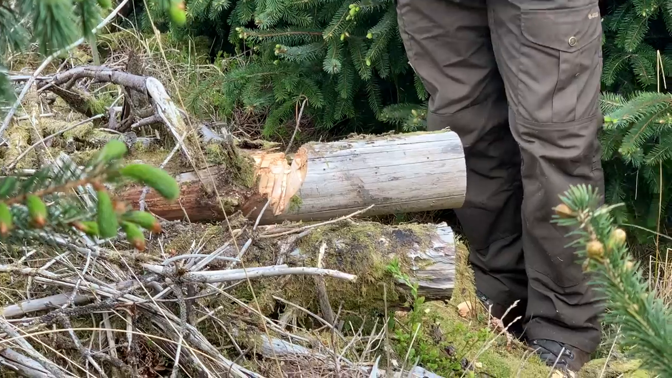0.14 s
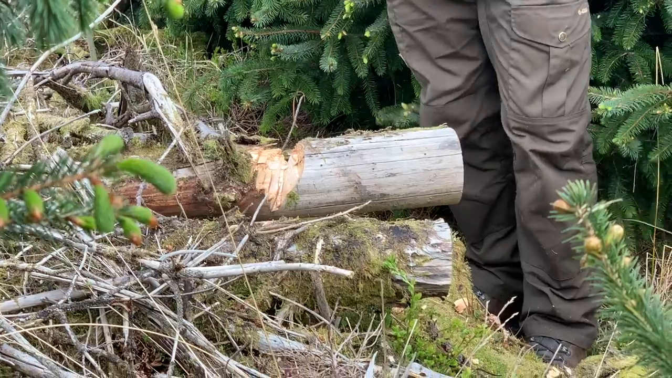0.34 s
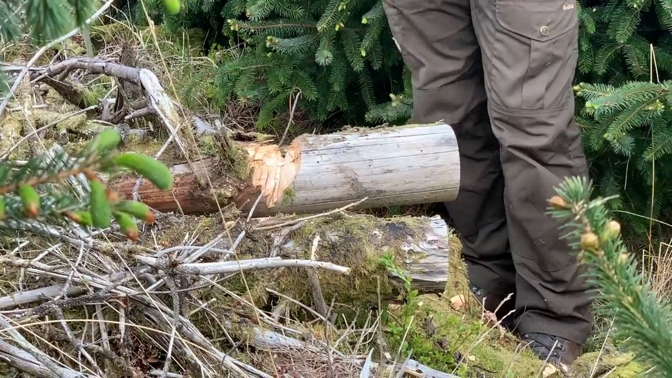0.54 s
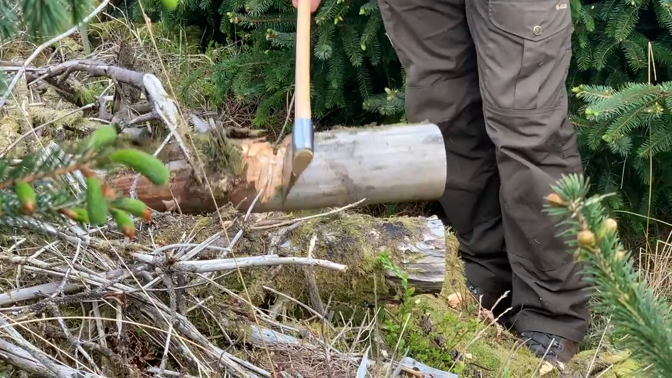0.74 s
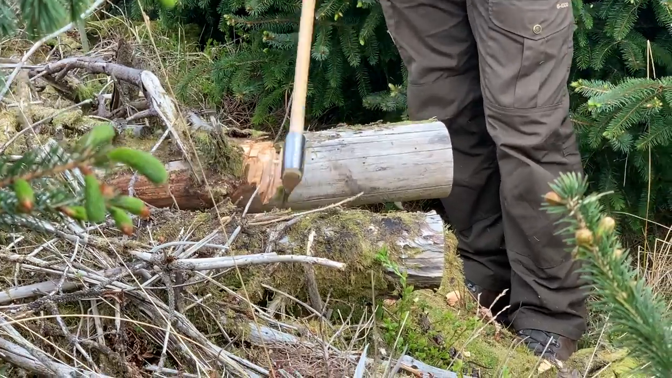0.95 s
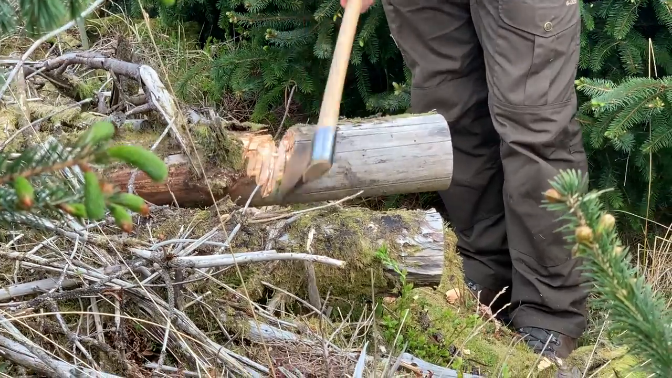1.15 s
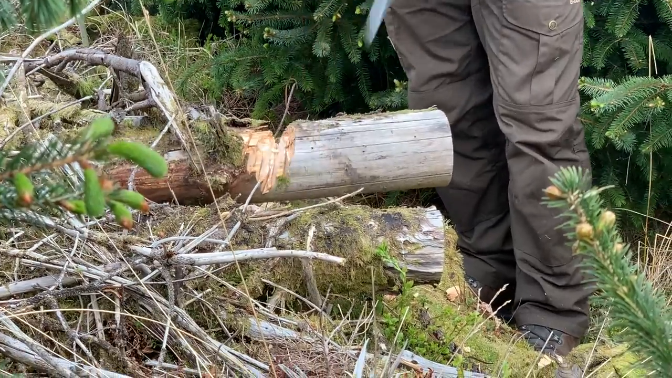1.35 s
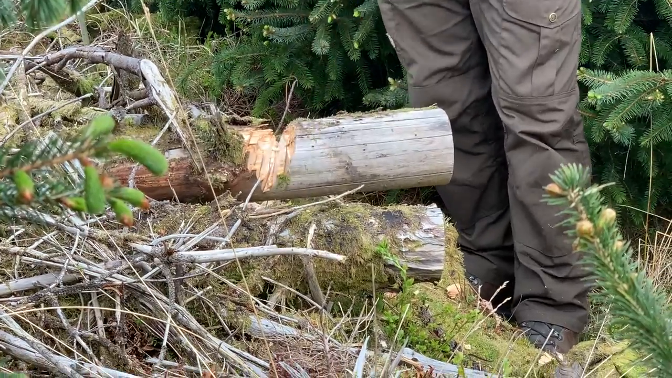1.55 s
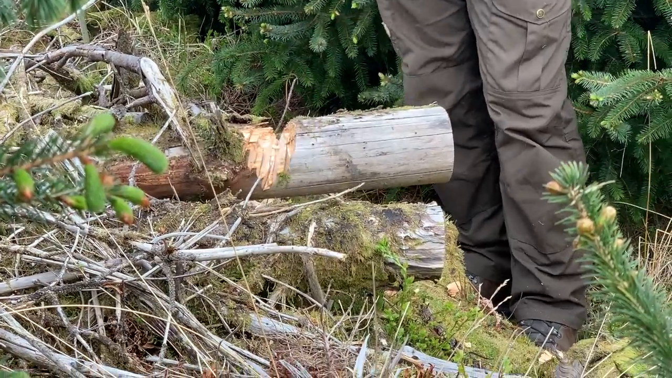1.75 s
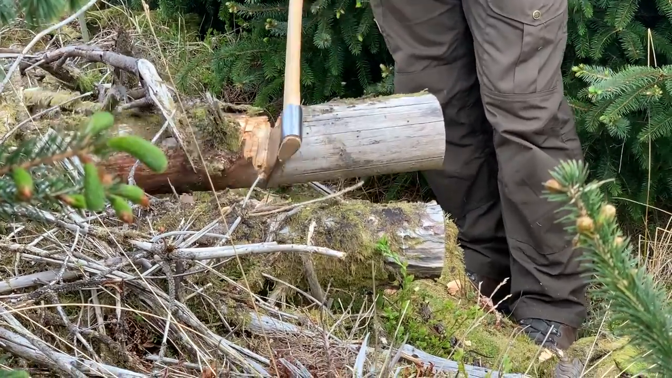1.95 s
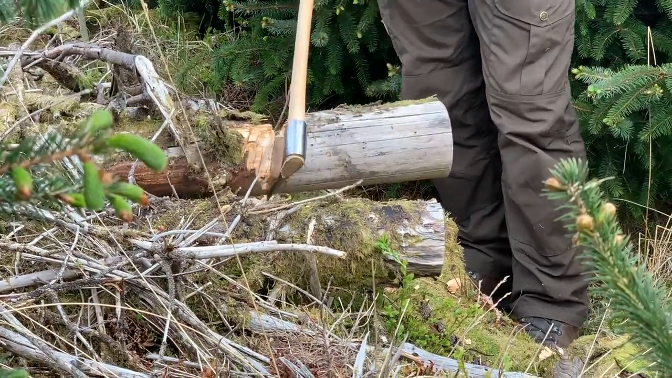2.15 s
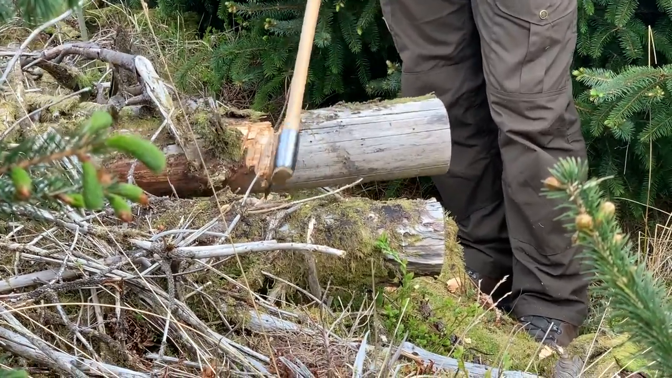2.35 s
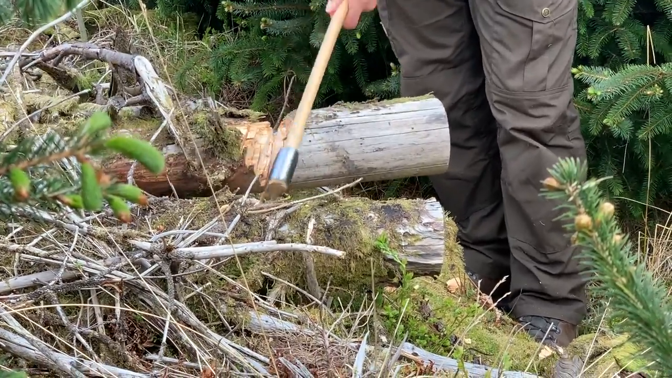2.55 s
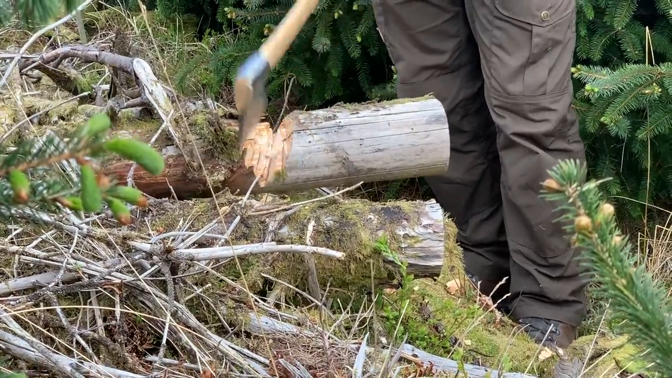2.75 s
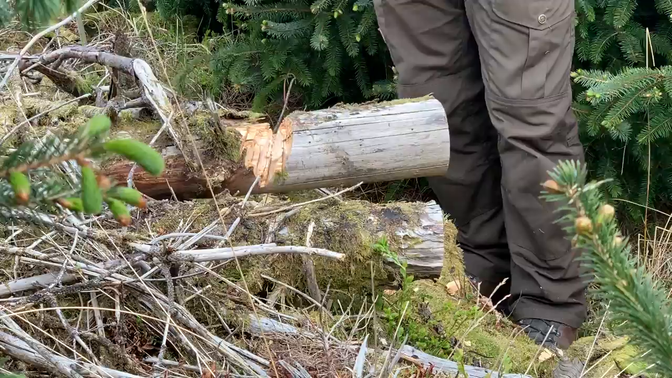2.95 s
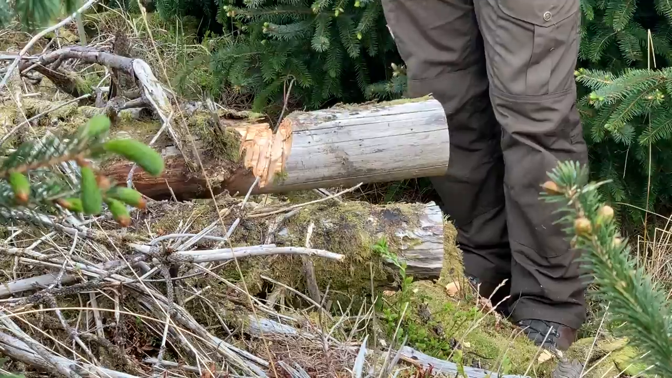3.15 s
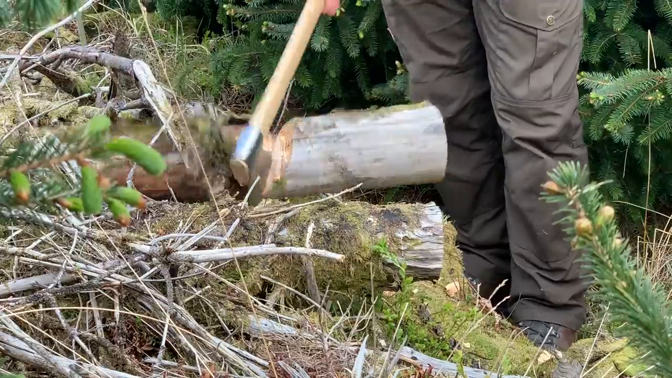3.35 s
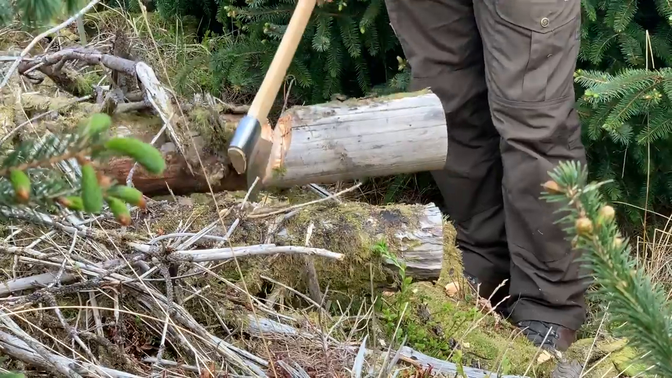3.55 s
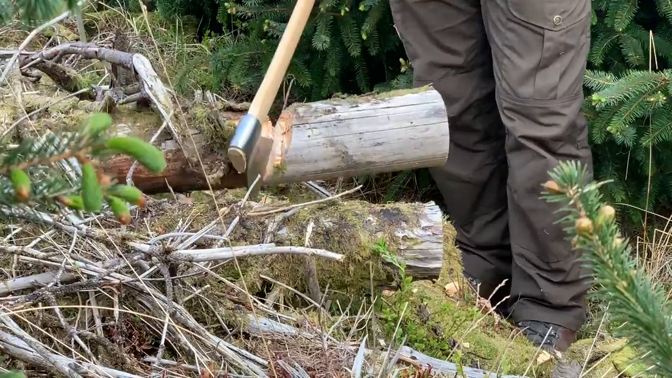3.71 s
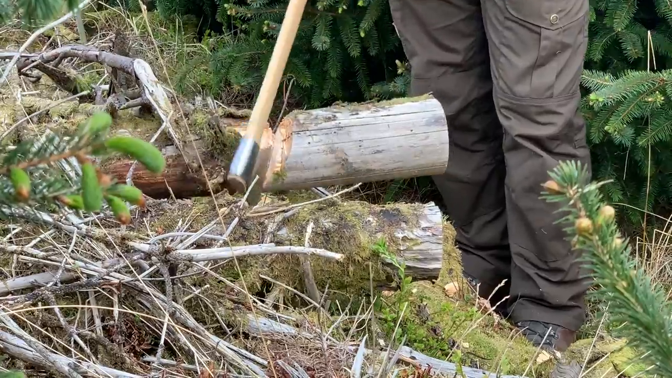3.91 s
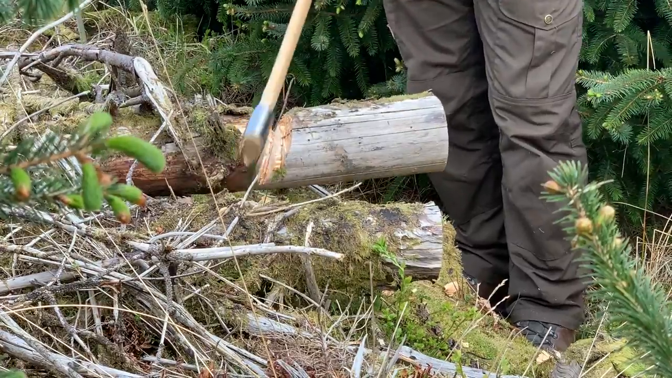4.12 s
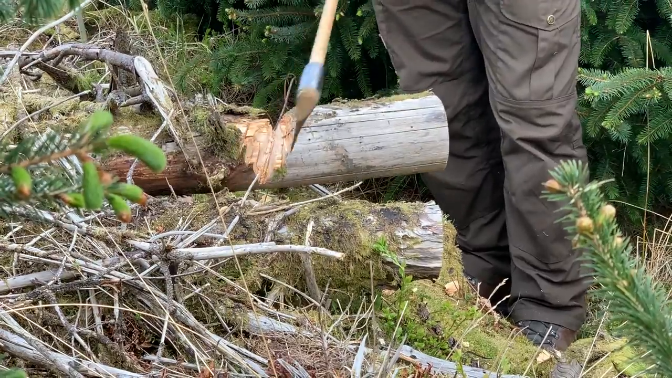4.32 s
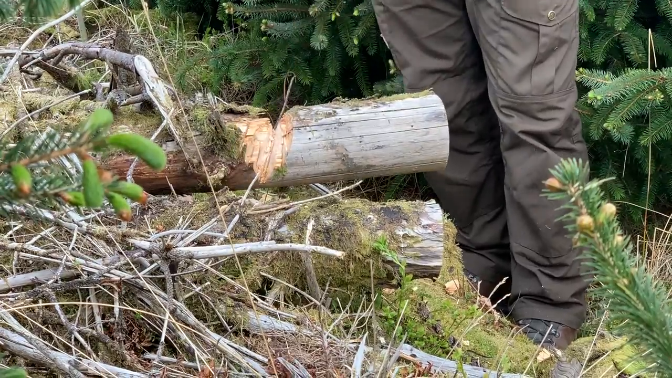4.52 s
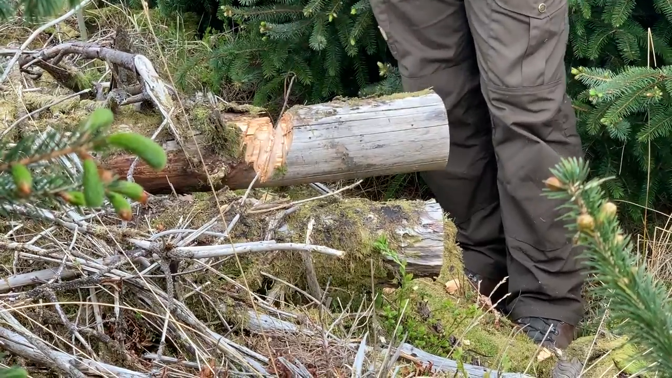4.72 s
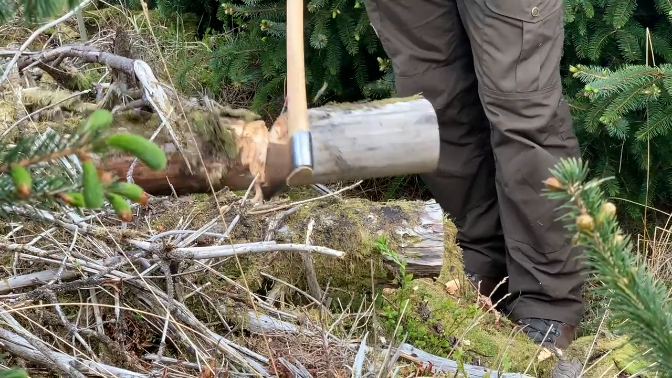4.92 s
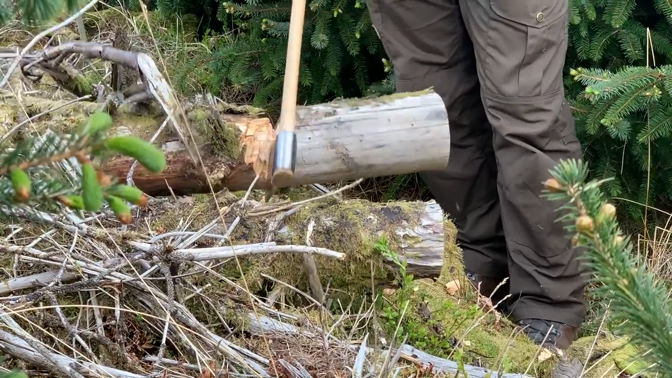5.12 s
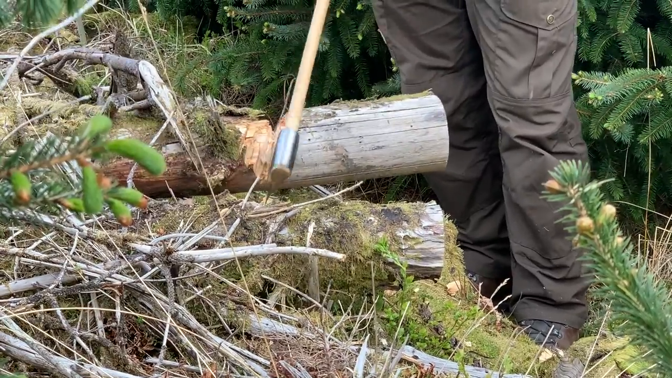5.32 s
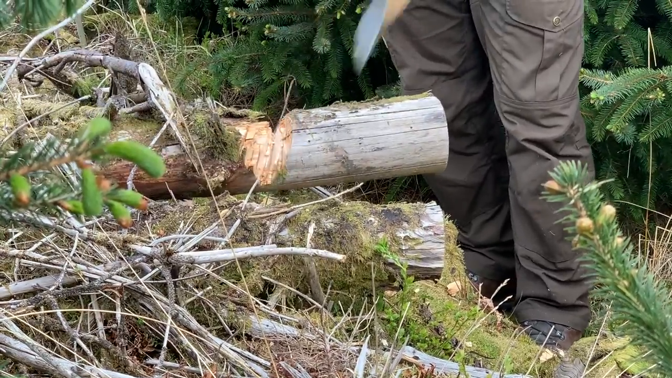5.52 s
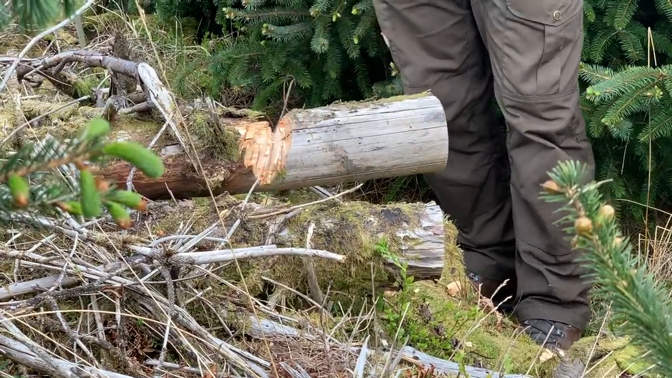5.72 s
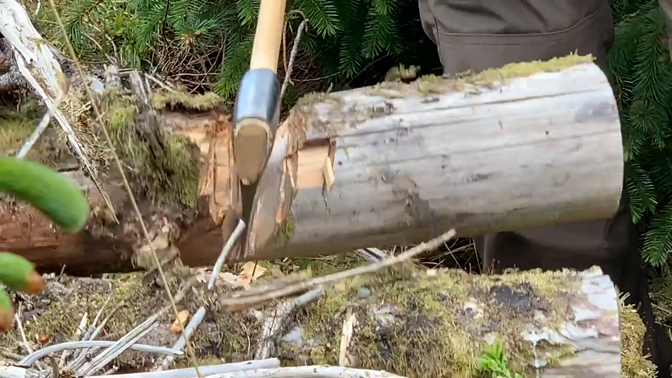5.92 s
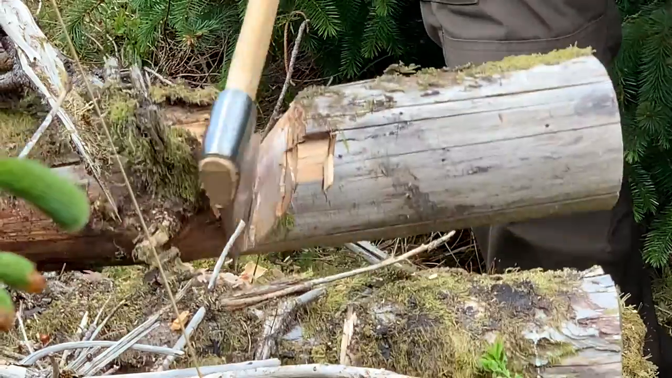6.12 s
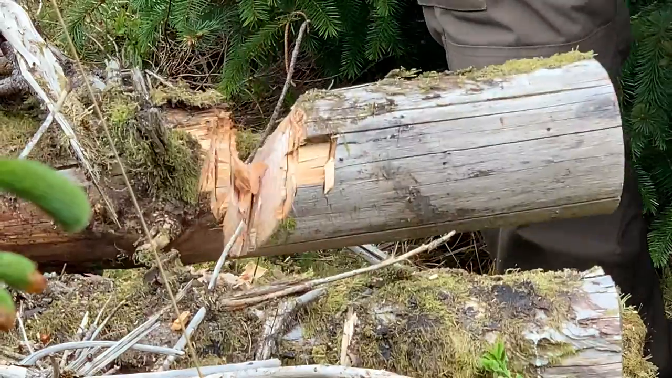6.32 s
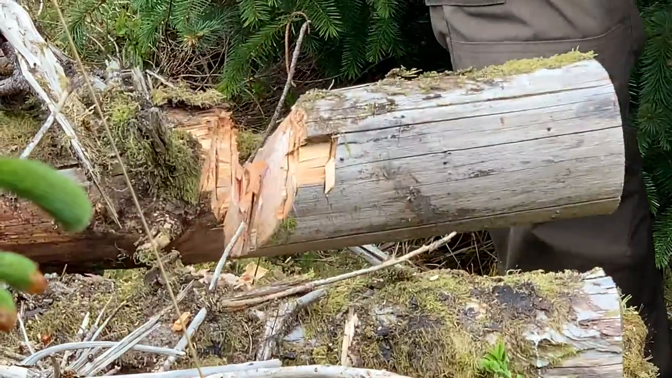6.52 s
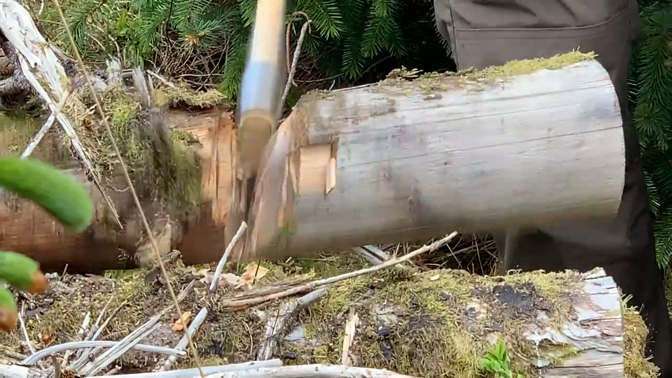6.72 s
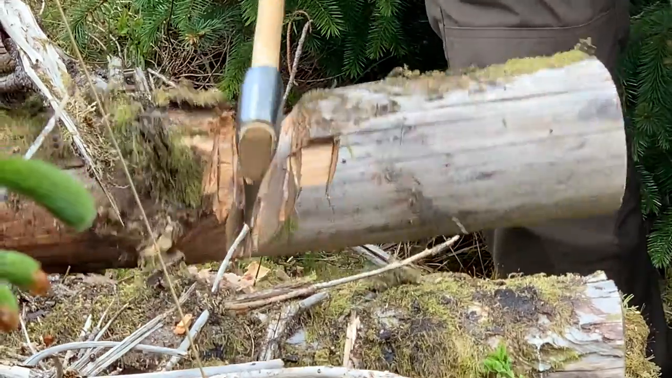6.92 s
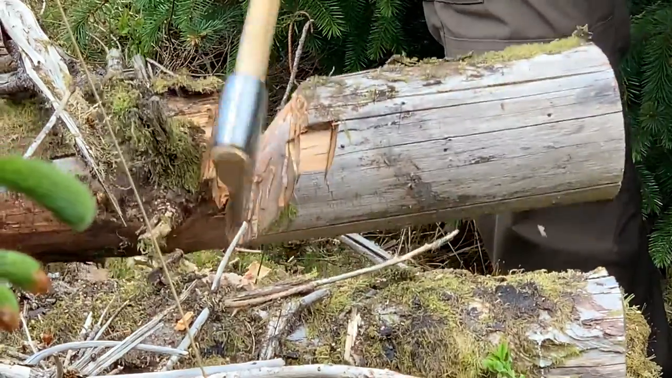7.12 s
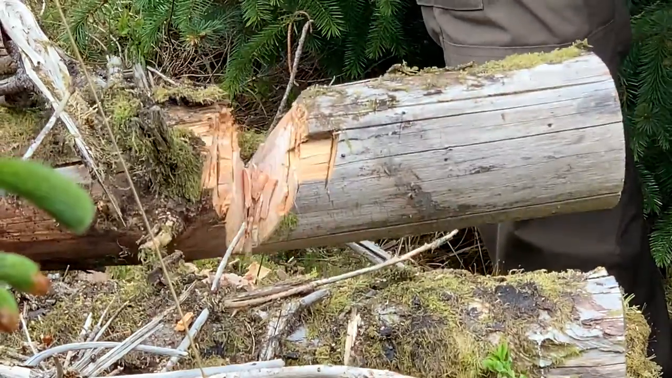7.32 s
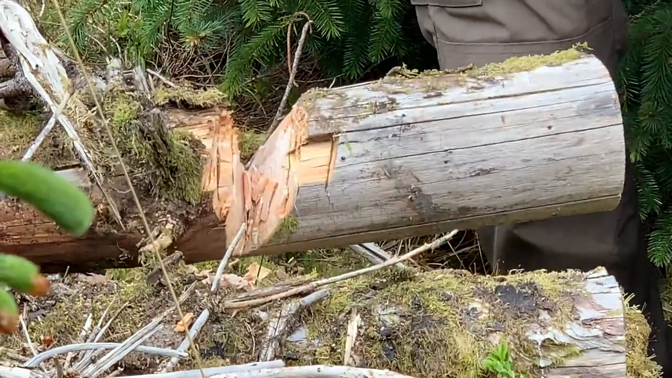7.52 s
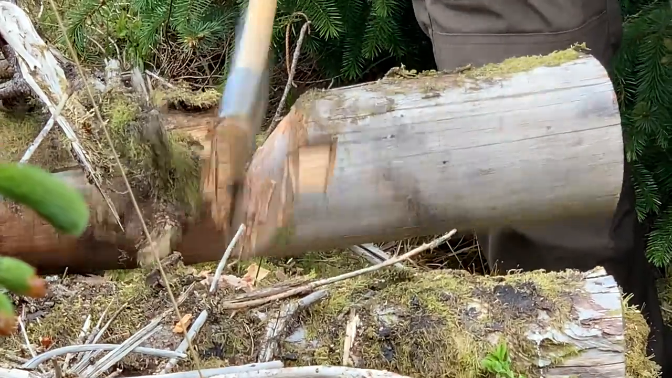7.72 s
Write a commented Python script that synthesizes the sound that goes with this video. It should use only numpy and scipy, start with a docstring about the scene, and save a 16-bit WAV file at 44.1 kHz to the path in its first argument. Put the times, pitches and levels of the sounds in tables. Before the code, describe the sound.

An axe bites six times into a dry dead log in quiet woodland, with woody thocks, splintering cracks, and small ticks and creaks between blows.

```python
"""Conifer wood: an axe bites six times into a dead log, two metres from two microphone ports.
Each blow is fibre crackle (noise clicks) plus decaying modes of log, then of mossy ground.
Between blows: chips tick (click bursts), the head works loose (soft knocks, sine squeaks).
Trees return a short noise tail of all these. Rustle and murmur are flickering noise bands,
which rise steeply just before each blow.
"""
import sys
import numpy as np
from scipy import signal
from scipy.fft import rfft, irfft, next_fast_len
from scipy.io import wavfile
from scipy.ndimage import uniform_filter1d

SR = 44100
rng = np.random.default_rng(int(sys.argv[2]) if len(sys.argv) > 2 else 0)


def file_out(sig):
    """Save sig as 16-bit WAV at sys.argv[1]."""
    # one column per channel
    cols = np.atleast_2d(sig).T
    # limit, then scale
    lim = np.clip(cols, -1, 1)
    pcm = np.round(lim * 32767).astype(np.int16)
    wavfile.write(sys.argv[1], SR, pcm)


N = 346626  # samples

# Levels are source settings, ahead of part gains, room and microphone.
# Axe blows: t/s, level/dB; re blow: ground boom/dB, ground thud/dB, trunk/dB, cut end/dB, knock/dB,
# clack/dB, bite/dB, splinter/dB; bite f/Hz, crunch time scale/ms
BLOWS = [(0.712, -1.5, -28.5, -12.5, -8, -9, -9.5, -11.5, -9, -7.5, 3892, 4),
         (1.867, 2.5, -36.5, -19.5, -13, -6.5, -8.5, -12, -14, -11, 3478, 4),
         (3.34, 2.5, -32, -16.5, -13, -3.5, -15.5, -11.5, -14, -12.5, 3266, 4.4),
         (4.886, -6, -33.5, -14, -19.5, -3.5, -10, -8, -7.5, 0, 4065, 4),
         (6.723, 3, -39, -17, -12.5, -7, -10.5, -10, -17, -10, 3722, 2.7),
         (7.7237, 0, -36, -16.5, -11.5, -5.5, -3.5, -4.5, -13.5, -9.5, 3580, 3.7)]
# Log and cut-end shifts as the head is levered free:
# t/s, log level/dB, knock re log/dB, ground level re log/dB
BUMPS = [(0.893, -66.5, -10, 16), (0.945, -68, -10, 17), (1.006, -56, -12, 14), (1.034, -62, -10, 16.5),
         (1.326, -53, -10, -12), (2.495, -45.5, 1, -3), (2.636, -51, 6, -9.5), (2.655, -62.5, -9.5, 14.5),
         (3.114, -56, 6, -23), (3.134, -57.5, 0, -11.5), (4.619, -60, 8.5, -14.5), (5.022, -60, 14, 3.5),
         (5.075, -64.5, -10, 12), (5.162, -51, -4, -12), (5.773, -54.5, 3, -16), (5.85, -52.5, -7.5, 10.5),
         (6.294, -62.5, 11.5, -14.5)]
# Modes of log and ground, low to high: nominal f/Hz, level/dB, t60/s
BOOM_MODES = [(44, -7.5, 0.11), (57.62, -0.5, 0.29)]
THUD_MODES = [(88, -2.5, 0.048), (107.5, -4, 0.14), (127, 0, .09)]
TRUNK_MODES = [(170, -8, .06), (233, 0, .075)]
CUT_END_MODES = [(305, 0, .05), (385, -7, .035)]
KNOCK_MODES = [(590, 0, .036), (690, -3, .028), (800, -2, .026)]
CLACK_MODES = [(960, 0, .02), (1160, -3, .02), (1420, -2, .018), (1700, -4, .014), (2150, -9, .01)]
HEAVE_S = .025  # log stop to ground boom
# Blade squeaks: t/s, peak level/dB, start f/Hz, length/ms
SQUEAKS = [(1.093, -47, 4000, 13), (1.096, -55, 2980, 13), (1.16, -56, 3700, 11), (1.172, -55, 3730, 13),
           (2.066, -43, 3340, 12), (2.074, -42.5, 4470, 8.5), (2.54, -54, 4120, 12), (2.575, -58, 3697, 30),
           (5.047, -55, 1670, 18)]
# Loudest chips, twigs, bark: t/s, level/dB, centre f/Hz, treble re level/dB
TICKS = [(0.4085, -43.5, 4300, -25), (0.4355, -52, 4800, -23), (0.4472, -50, 4570, -24),
         (0.906, -38.5, 5600, -3), (1.0227, -47.5, 4530, -19), (1.0935, -45.5, 4160, 2),
         (2.058, -52.5, 4500, 10), (2.1802, -47.5, 3040, -15), (2.354, -52, 5760, -16),
         (2.366, -48, 4900, -26), (2.4874, -44.5, 3500, -6), (2.5252, -49.5, 5100, -3),
         (2.6294, -43, 3500, 0), (2.633, -39.5, 4370, 5), (2.641, -46, 2500, 3), (2.732, -52, 4910, -17),
         (2.75, -51.5, 2320, -11), (3.3756, -33.5, 3730, -7), (3.6096, -43, 5040, -16),
         (3.647, -46.5, 5500, -4), (3.6678, -52, 4740, -0.5), (4.906, -27, 4130, 7),
         (5.0075, -42, 3610, -4), (5.0127, -31.5, 3380, -2), (5.0234, -38.5, 1790, -1.5),
         (5.0634, -51, 4550, 7), (5.0806, -45.5, 1760, 4.5), (5.3275, -50.5, 4180, -11),
         (5.398, -53, 4270, -15), (5.458, -57, 3500, -17), (5.617, -57, 4000, -15),
         (5.688, -57, 5000, -7.5), (5.8558, -55, 1830, 4.5), (6.0256, -49.5, 4530, -27),
         (6.9441, -48.5, 4500, -0.5), (7.781, -47, 5470, 9)]
TICK_MS, TICK_MS_PER_DB = 5.1, -0.05  # time scale at -51 dB; louder is slightly shorter
FAINT_COUNT, FAINT_DB, FAINT_HZ = 45, -60.5, 4360  # small crackle; mean level, median centre
# Port difference for near sources: f/Hz, left minus right level/dB, left phase lead/rad
PORTS = [(0, 0, 0), (400, 0, .05), (700, 1, .4), (1750, 1, .3), (2800, -2, 1.8), (4800, -8, 1.9),
         (5900, -3, 2.6), (6900, 0, 3), (8950, 0, .4), (16000, 0, -9.2)]
# Tree tail bands: f/Hz, relative level/dB, t60/s
TREES = [(720, -37.5, 0.13), (1620, -36, 0.2), (3600, -36.5, 0.14), (7900, -34.5, 0.2), (13000, -41, 0.073)]
# Clothes and brush rustles: centre t/s, Gaussian sigma/s, hiss level/dB, body level/dB
RUSTLES = [(0.0, 0.045, -63.5, -73), (0.166, 0.047, -58.5, -74), (0.349, .08, -66.5, -69),
           (0.886, 0.083, -63.5, -85), (1.006, 0.055, -70, -74), (1.177, 0.039, -60, -82),
           (1.1, 0.03, -68, -78), (1.569, 0.051, -72.5, -69), (2.058, 0.071, -60, -96),
           (2.342, 0.05, -79.5, -64.5), (2.516, 0.033, -64.5, -90), (2.626, 0.053, -62, -73),
           (3.05, 0.058, -76, -70), (3.48, 0.054, -65.5, -75.5), (3.602, 0.071, -64.5, -93),
           (3.92, 0.037, -71.5, -70.5), (4.192, 0.084, -73.5, -64), (4.61, .08, -76, -65),
           (5.083, 0.077, -62.5, -74), (5.33, 0.081, -70, -74), (5.554, 0.16, -78.5, -74.5),
           (5.94, 0.06, -67, -98), (6.138, 0.053, -70.5, -74), (6.47, 0.063, -65.5, -66),
           (6.913, 0.087, -66.5, -78), (7.092, 0.054, -71, -76.5), (7.419, 0.076, -69, -76)]
# Noise rising steeply into each blow; rows hiss, body, rumble: level at blow/dB, rise/(dB/s)
RISES = [(-66.5, 93), (-56.5, 122.5), (-66, 60)]
SHUDDER_DB, SHUDDER_DB_PER_S = -52, 79.5  # start re blow level, fall rate
# Murmur of the wood: t/s, body level/dB
MURMUR = [(0, -67), (1.0, -70.5), (2.3, -68), (3.0, -70), (4.4, -71.5), (5.3, -68.5), (5.8, -68),
          (5.95, -72.5), (7.86, -73)]
HISS_DB, RUMBLE_DB = -81, -81.5  # resting levels
# Likeness of the two channels of the wood: f/Hz, correlation
LIKENESS = [(60, 1), (290, 0.93), (640, 0.56), (1400, 0.067), (3000, 0.03), (16000, 0.01)]
# Microphone response: f/Hz, level/dB
MIC = [(30, -9), (50, 1.5), (1500, 1.5), (2740, -0.5), (4500, 2.5), (6900, 2), (8760, 4.5), (10500, 1),
       (11600, -13), (12800, 5), (14800, 1), (16500, -24)]
TOP_HZ = 16600


def undb(db):
    """Amplitude ratio of a level in dB."""
    return 10 ** (np.asarray(db) / 20)


def add(track, s, sound):
    """Mix sound into track at time s, cut at the track end."""
    i = int(s * SR)
    track[..., i:i + sound.shape[-1]] += sound[..., :track.shape[-1] - i]


def band(x, hz, width_oct):
    """Gaussian band around hz on a log frequency axis, sigma in octaves."""
    f_hz = np.arange(x.shape[-1] // 2 + 1) * SR / x.shape[-1] + 1
    bell = np.exp(-.5 * (np.log2(f_hz / hz) / width_oct) ** 2)
    return irfft(rfft(x) * bell, x.shape[-1])


def unit(x):
    """Scale to RMS 1."""
    return x / np.sqrt(np.mean(x ** 2))


def decay(t_s, t60_s):
    """Exponential fall of 60 dB in t60."""
    return np.exp(-np.log(1000) * t_s / t60_s)


def walk(rate_hz):
    """Random levels held 1 / rate, smoothed by two moving averages; spread near 1."""
    hold = int(SR / rate_hz)
    steps = np.repeat(rng.standard_normal(N // hold + 1), hold)
    return 1.3 * uniform_filter1d(uniform_filter1d(steps, hold), hold)[:N]


def ring(modes, push_ms, scatter_db=1., detune=.025):
    """Decaying modes set off by a smooth push, level and pitch scattered per strike; peak 1."""
    t_s = np.arange(16384) / SR
    chance = rng.standard_normal((len(modes), 2))
    x = np.zeros(len(t_s))
    for (hz, db, t60_s), (a, b) in zip(modes, chance):
        tone = np.sin(2 * np.pi * hz * (1 + detune * b) * t_s)
        x += undb(db + scatter_db * a) * tone * decay(t_s, t60_s)
    push = np.hanning(int(push_ms * SR / 1000) + 3)
    x = np.convolve(x, push)[:len(t_s)]
    return x / np.abs(x).max()


def burst(hz, width_oct, ms, tail_db=-26.0, tail=8.1):
    """Snapping fibres: uneven clicks swell, die away and crackle on faintly; tail in units of ms."""
    t = np.arange(4096) / SR / (max(ms, .3) / 1000)
    clicks = rng.standard_normal(4096) * undb(4 * rng.standard_normal(4096))
    swarm = (3.37 * t * np.exp(1 - 2.526 * t)) ** 0.64
    swarm = swarm + undb(tail_db) * np.minimum(t, 1) * np.exp(-t / tail)
    return unit(band(clicks, hz, width_oct)) * swarm * 0.35


def axe():
    """The edge crunches through fibres, then the head's weight loads the log and, later, the ground."""
    out = np.zeros(N)
    for s, db, boom, thud, trunk, cut_end, knock, clack, bite, splinter, bite_hz, ms in BLOWS:
        add(out, s - .001, undb(db + splinter) * burst(6600, 0.8, ms))
        add(out, s - .0005, undb(db + bite) * burst(bite_hz, 0.25, 1.1 * ms, -36.))
        stop_s = s + .5 * ms / 1000
        add(out, stop_s - .0012, undb(db + clack) * 1.3 * ring(CLACK_MODES, .2))
        add(out, stop_s - .0008, undb(db + knock) * 1.6 * ring(KNOCK_MODES, 0.14))
        # trunk and cut end start in opposite polarity
        add(out, stop_s, undb(db + cut_end) * ring(CUT_END_MODES, 1.0))
        add(out, stop_s, -1.2 * undb(db + trunk) * ring(TRUNK_MODES, 1.0))
        add(out, stop_s + 0.0028, undb(db + thud) * ring(THUD_MODES, 6.2))
        add(out, stop_s + HEAVE_S, undb(db + boom) * ring(BOOM_MODES, 15.0))
    return out


def bumps():
    """Levering the head shifts the log: soft log and knock modes, ground modes 9 ms later."""
    out = np.zeros(N)
    for s, db, knock_db, ground_db in BUMPS:
        log = ring(TRUNK_MODES + CUT_END_MODES, 0.9)
        knock = undb(knock_db) * ring(KNOCK_MODES + CLACK_MODES, 0.43)
        add(out, s, undb(db) * (log + knock))
        add(out, s + 0.009, undb(db + ground_db) * ring(BOOM_MODES + THUD_MODES, 6.9))
    return out


def squeaks():
    """Steel slipping in wood: brief rising sines with a random phase wobble."""
    out = np.zeros(N)
    for s, db, hz, ms in SQUEAKS:
        t_s = np.arange(int(ms * SR / 1000)) / SR
        wobble_rad = np.cumsum(0.032 * rng.standard_normal(len(t_s)))
        tone = np.sin(2 * np.pi * hz * t_s * (1 + 2.3 * t_s) + wobble_rad)
        add(out, s, undb(db) * np.hanning(len(t_s)) * tone)
    return out


def ticks():
    """Dry snaps: click burst plus treble burst; faint ones cluster around the rustles."""
    out = np.zeros(N)
    chance = rng.standard_normal((FAINT_COUNT, 4))
    during = np.array(RUSTLES)[rng.integers(0, len(RUSTLES), FAINT_COUNT)]
    faint = []
    for (s, sigma_s, _, _), (a, b, c, d) in zip(during, chance):
        tick_s = max(s + 2 * sigma_s * a, .01)
        faint.append((tick_s, FAINT_DB + 3 * b, FAINT_HZ * 2 ** (0.22 * c), -8 + 5 * d))
    for s, db, hz, treble_db in TICKS + faint:
        ms = TICK_MS + TICK_MS_PER_DB * (db + 51)
        middle = burst(hz, 0.65, ms, -30.5)
        edge = undb(treble_db) * burst(8200, 0.33, 0.65 * ms, -28.0)
        add(out, s - .002, undb(db) * (middle + edge))
    return out


def ports(x):
    """Near sound at two ports: level and phase difference, split evenly between left and right."""
    f_hz = np.arange(N // 2 + 1) * SR / N
    hz, db, rad = np.transpose(PORTS)
    half = undb(np.interp(f_hz, hz, db) / 2) * np.exp(.5j * np.interp(f_hz, hz, rad))
    return irfft(rfft(x) * np.array([half, 1 / half]), N)


def trees(x):
    """Trunks and needles scatter near sound: convolution with a patchy decaying stereo noise tail."""
    t_s = np.arange(16384) / SR
    tail = 0
    for hz, db, t60_s in TREES:
        patches = undb(db + walk(120)[:len(t_s)])
        noise = unit(band(rng.standard_normal((2, len(t_s))), hz, 0.77))
        tail = tail + patches * noise * decay(t_s, t60_s)
    tail = tail * np.clip(t_s / 0.0013, 0, 1) / 8
    return signal.fftconvolve(x[None], tail, axes=1)[:, :N]


def motion():
    """Hiss, body, rumble gains: rest, rustles, rises before blows, shudder of brush pile and ground."""
    t_s = np.arange(0, N, 64) / SR
    hiss, rumble = undb(HISS_DB), undb(RUMBLE_DB)
    body = undb(np.interp(t_s, *np.transpose(MURMUR)))
    for s, sigma_s, hiss_db, body_db in RUSTLES:
        swell = np.exp(-.5 * ((t_s - s) / sigma_s) ** 2)
        hiss = np.hypot(hiss, undb(hiss_db) * swell)
        body = np.hypot(body, undb(body_db) * swell)
    for s, db, *_ in BLOWS:
        away_s = np.abs(t_s - s)
        rises = [undb(top_db - db_per_s * away_s) * (t_s < s) for top_db, db_per_s in RISES]
        shudder = undb(db + SHUDDER_DB - SHUDDER_DB_PER_S * away_s) * (t_s >= s)
        hiss = np.hypot(hiss, rises[0])
        body = np.hypot(body, rises[1])
        rumble = np.hypot(rumble, rises[2] + shudder)
    return (np.interp(np.arange(N) / SR, t_s, gain) for gain in (hiss, body, rumble))


def wood():
    """Flickering half-octave noise bands, weighted as hiss, body, rumble; correlation set per band."""
    hiss, body, rumble = motion()
    like_hz, like = np.transpose(LIKENESS)
    # scratchy grains of uneven size, 60 samples each
    grains = undb(1.8 * np.repeat(rng.exponential(1., N // 60 + 1), 60)[:N])
    out = 0
    for hz in 35 * 2 ** np.arange(0, 9, .5):
        noise = rng.standard_normal((2, N)) * (grains if hz > 1400 else 1)
        mid, side = unit(band(noise, hz, 0.27))
        octave = np.log2(hz)
        gain = (rumble * undb(-6.5 - 12 * abs(octave - np.log2(60)))
                + body * undb(-6 - 4.7 * abs(octave - np.log2(750)))
                + hiss * undb(-4.0 - 5.8 * max(np.log2(3500) - octave, 0)))
        flicker = undb(2.2 * walk(15) + walk(70))
        c = np.clip(np.interp(np.log(hz), np.log(like_hz), like), 0, 1)
        stereo = np.sqrt((1 + c) / 2) * mid + np.sqrt((1 - c) / 2) * side * np.array([[1], [-1]])
        out = out + gain * flicker * stereo
    return out


def scene():
    """Near sources at the ports, their tree tail, and the wood behind."""
    near = axe() + bumps() + squeaks() + ticks()
    return ports(near) + trees(near) + wood()


def record(dry, turns=.7, ceiling=1.2):
    """Microphone colour, delay of a fixed number of cycles (lows come late), soft clip, top cut."""
    size = next_fast_len(N + 8192)
    f_hz = np.arange(size // 2 + 1) * SR / size + 1
    hz, db = np.transpose(MIC)
    colour = undb(np.interp(np.log(f_hz), np.log(hz), db))
    # group delay = turns / f between 35 and 4000 Hz
    late = np.exp(-2j * np.pi * turns * np.log(np.clip(f_hz, 35, 4000) / 35))
    x = irfft(rfft(dry, size) * colour * late, size)[:, :N]
    clipped = ceiling * np.tanh(x / ceiling)
    top_cut = signal.ellip(10, .2, 70, TOP_HZ, fs=SR, output="sos")
    return signal.sosfilt(top_cut, clipped)


dry = scene()
out = record(dry)
file_out(out)
```